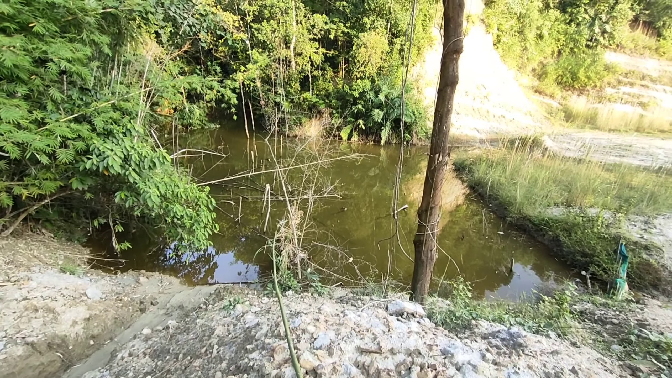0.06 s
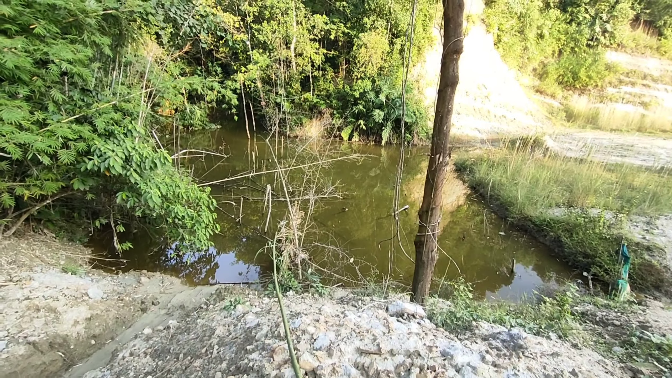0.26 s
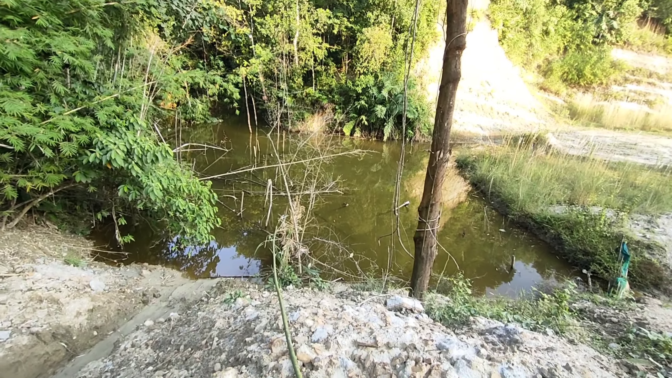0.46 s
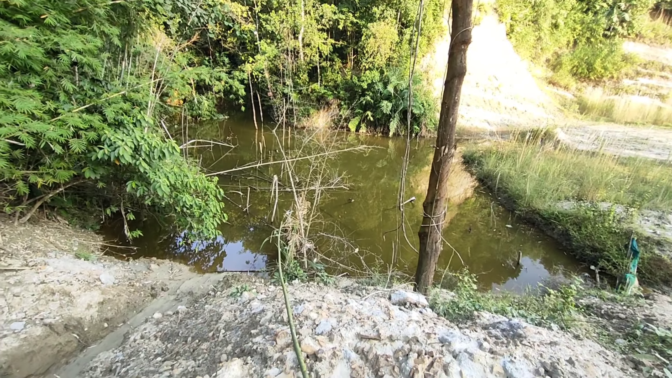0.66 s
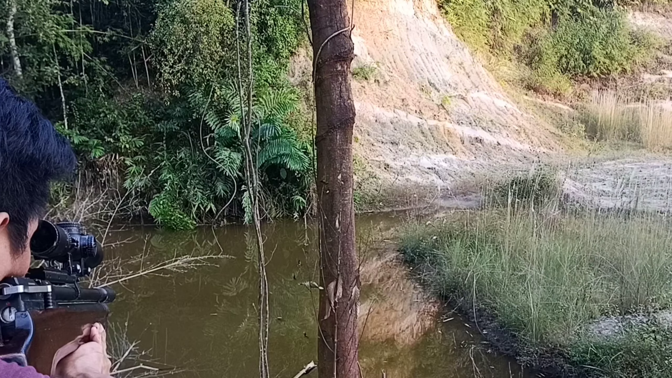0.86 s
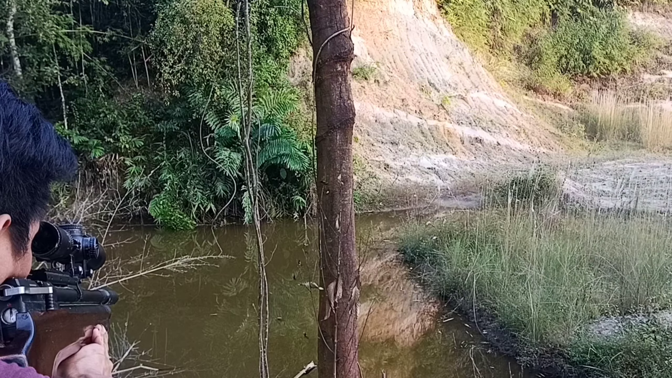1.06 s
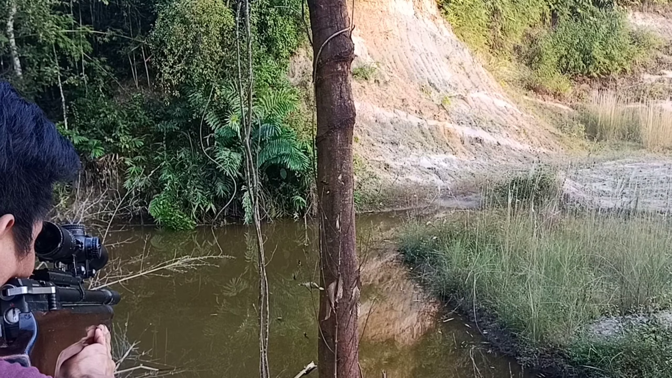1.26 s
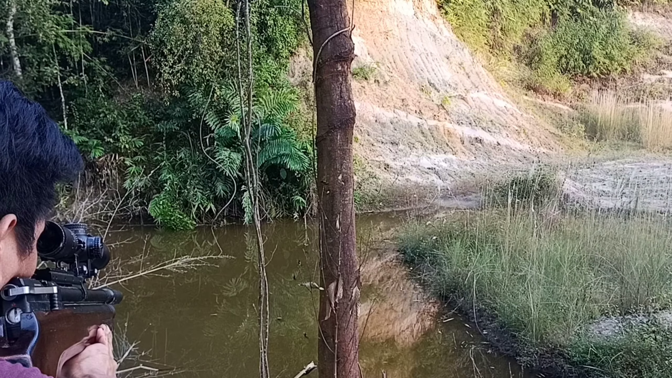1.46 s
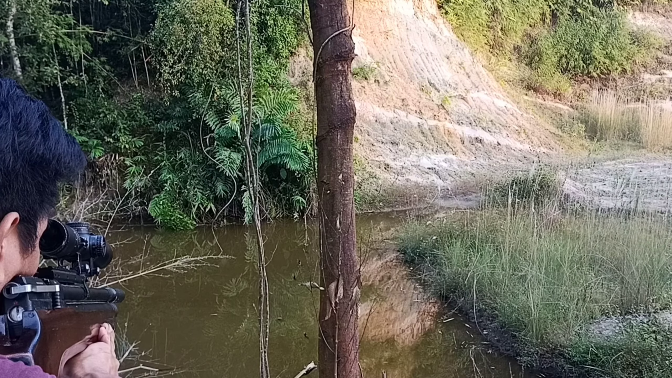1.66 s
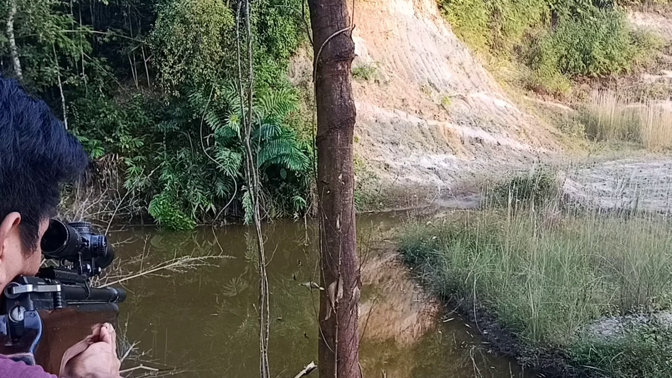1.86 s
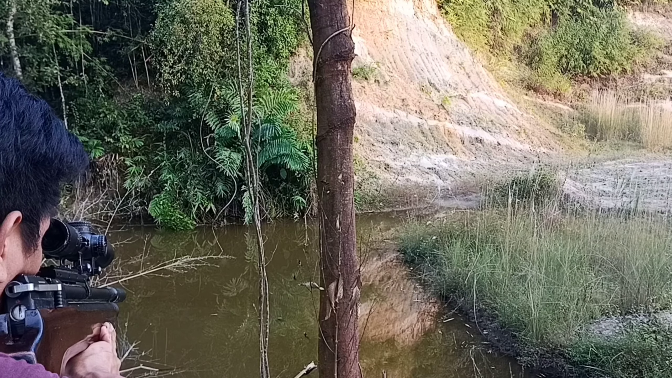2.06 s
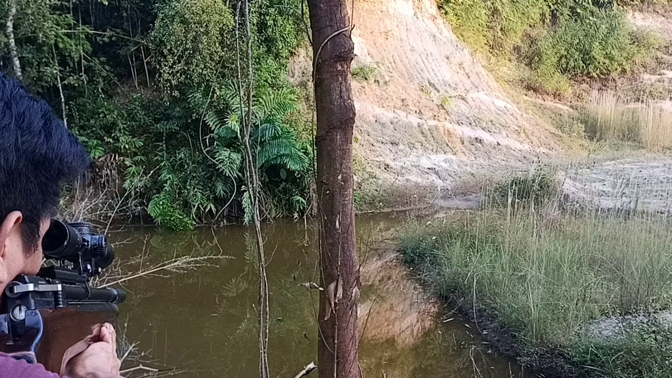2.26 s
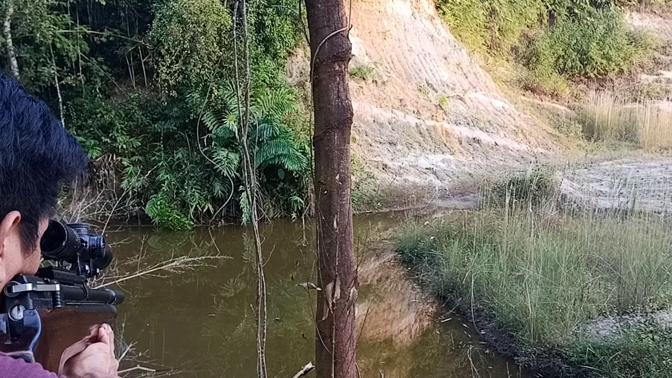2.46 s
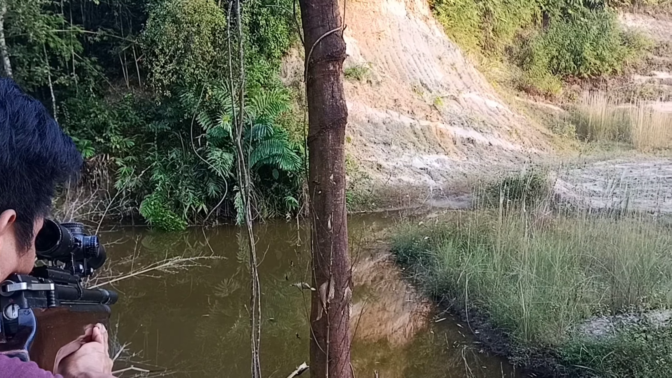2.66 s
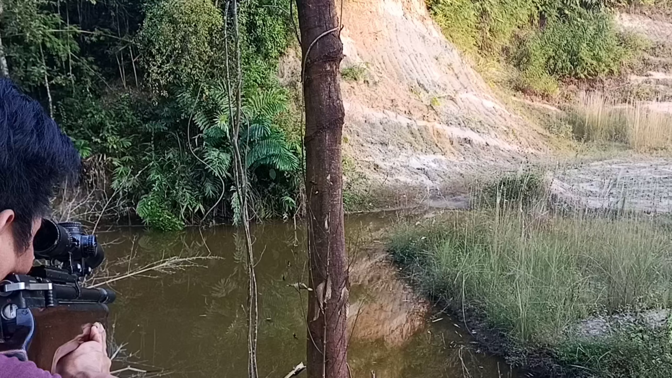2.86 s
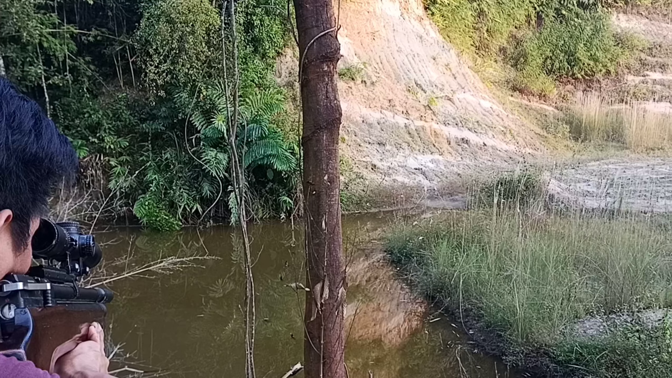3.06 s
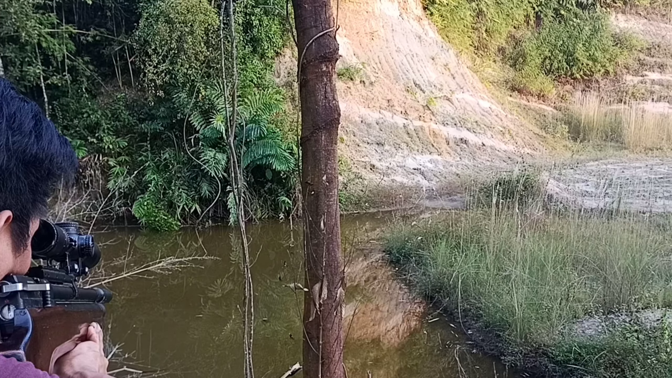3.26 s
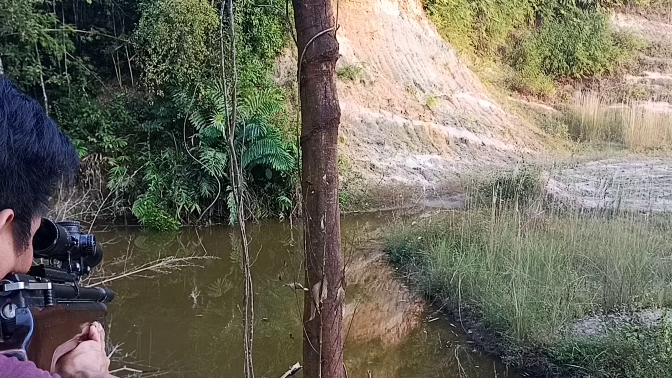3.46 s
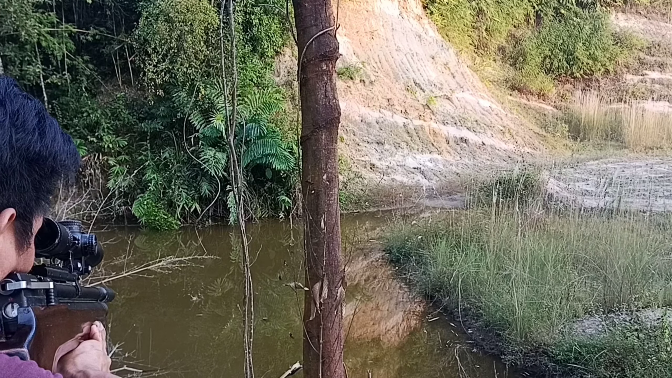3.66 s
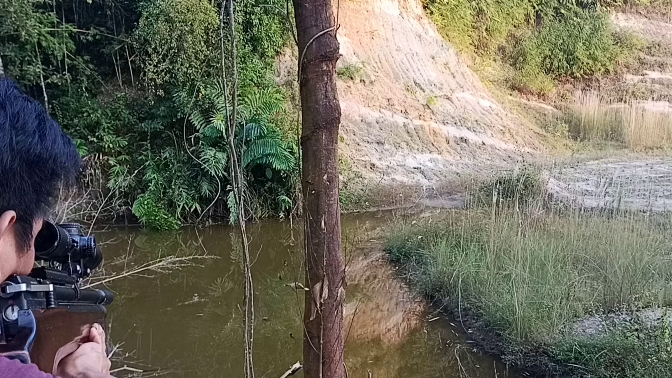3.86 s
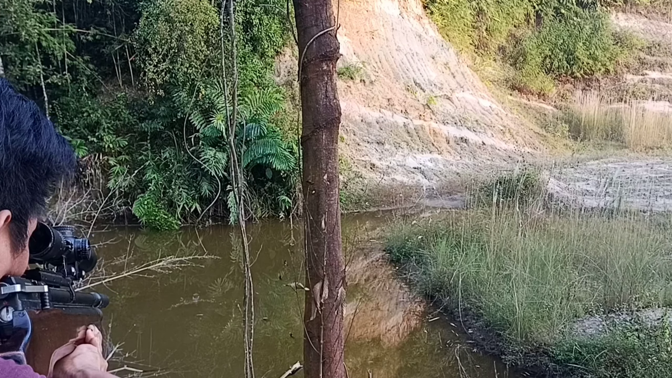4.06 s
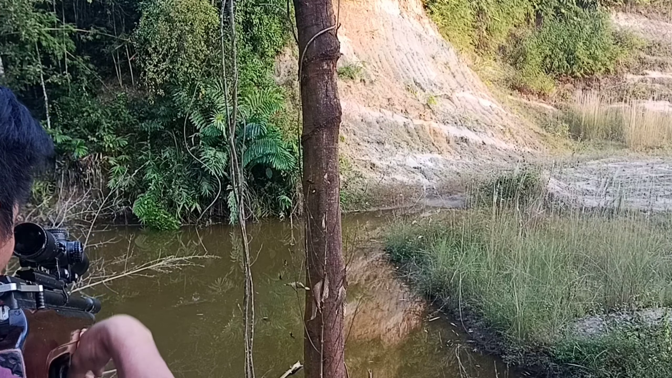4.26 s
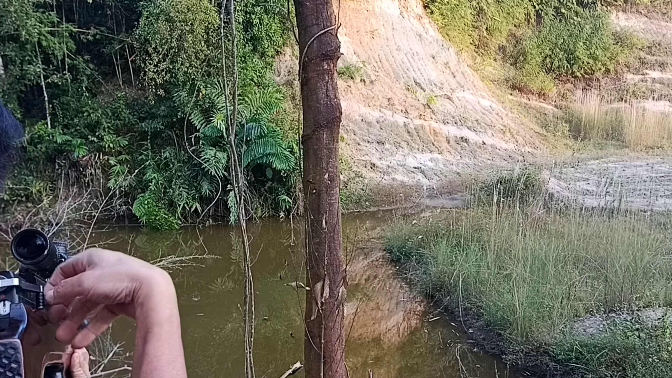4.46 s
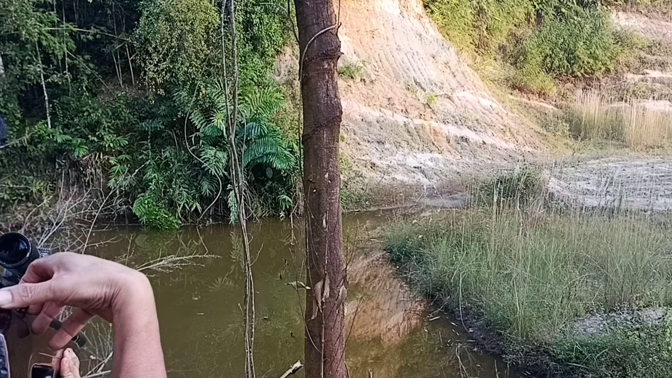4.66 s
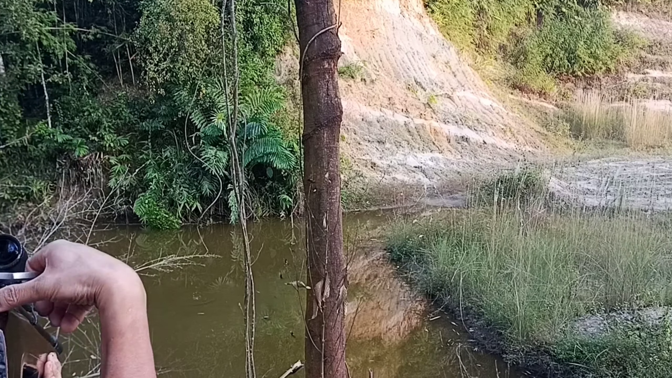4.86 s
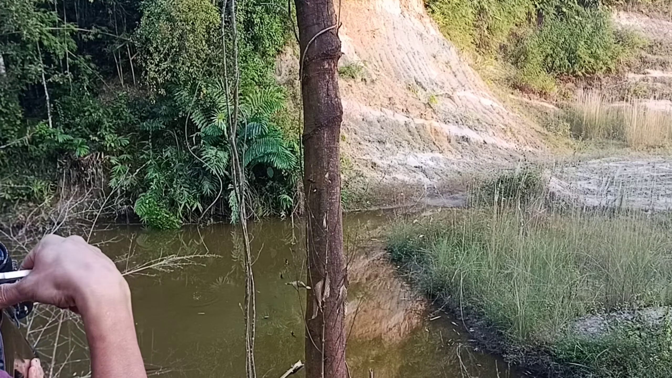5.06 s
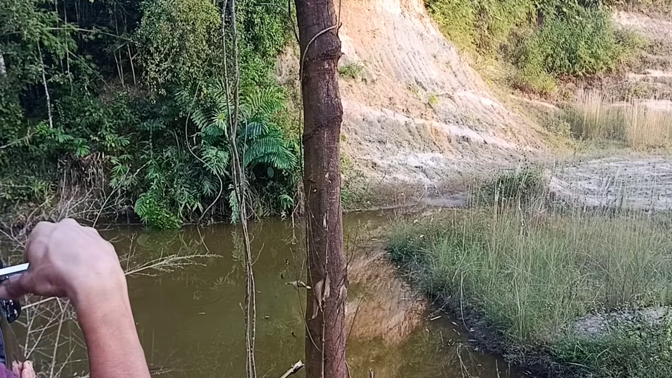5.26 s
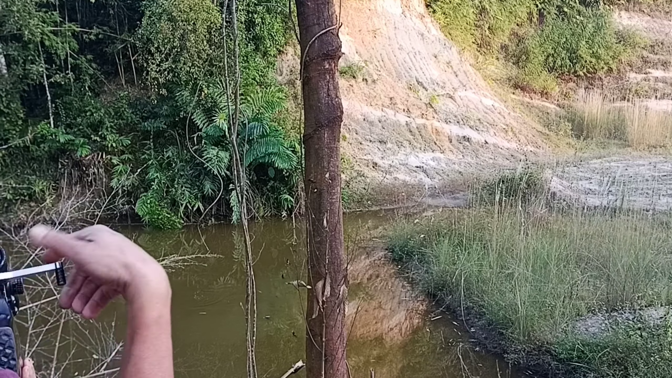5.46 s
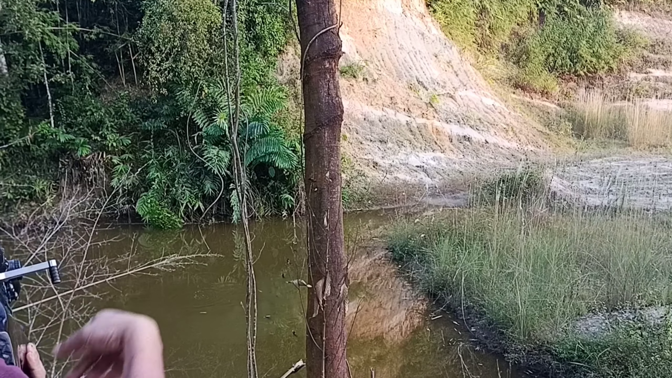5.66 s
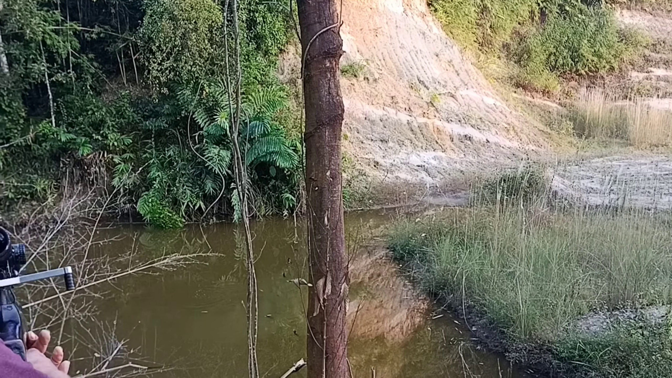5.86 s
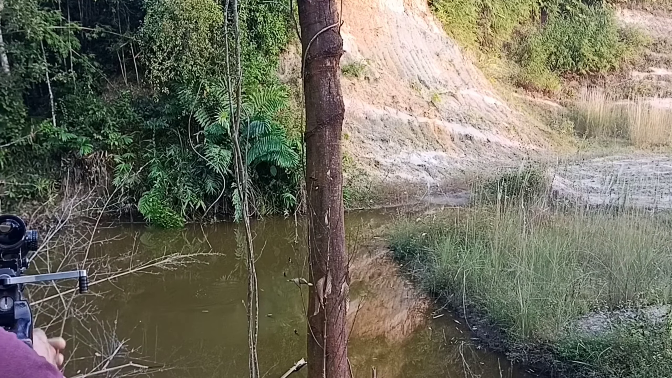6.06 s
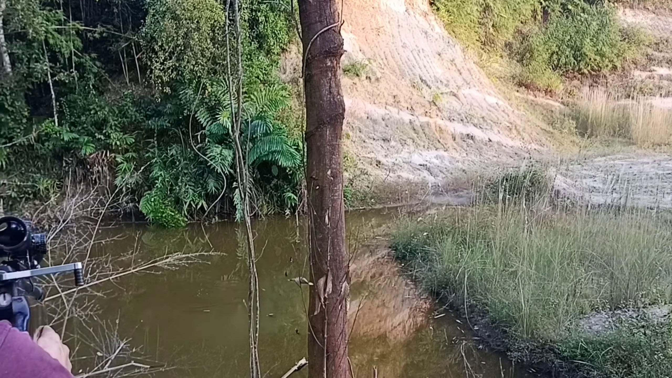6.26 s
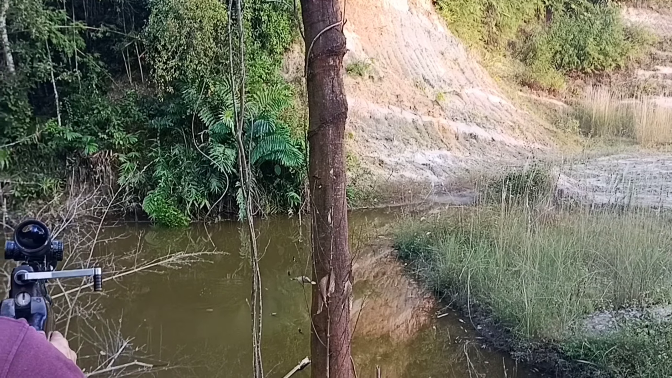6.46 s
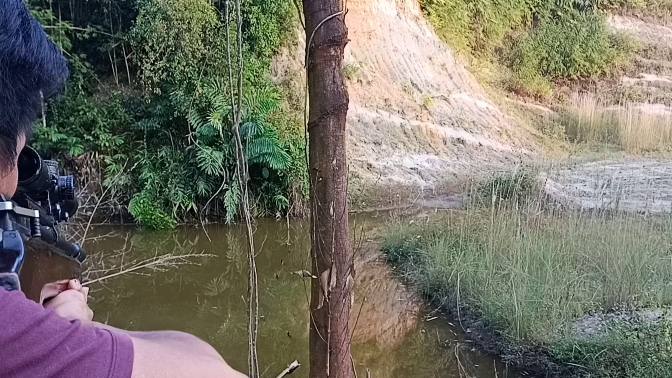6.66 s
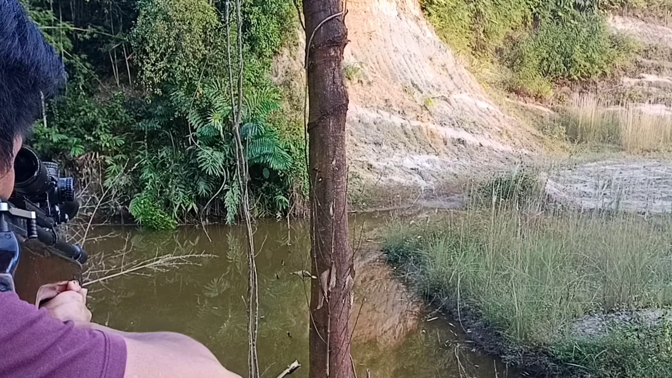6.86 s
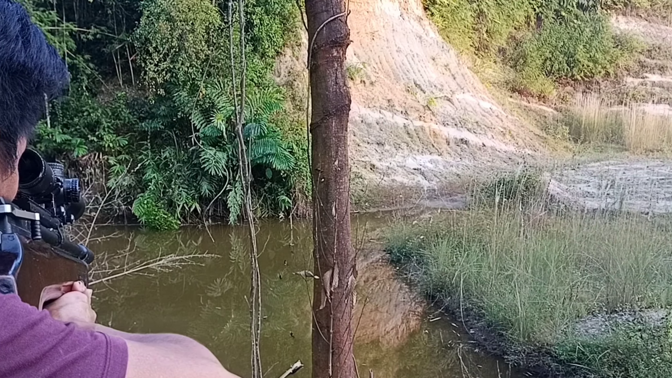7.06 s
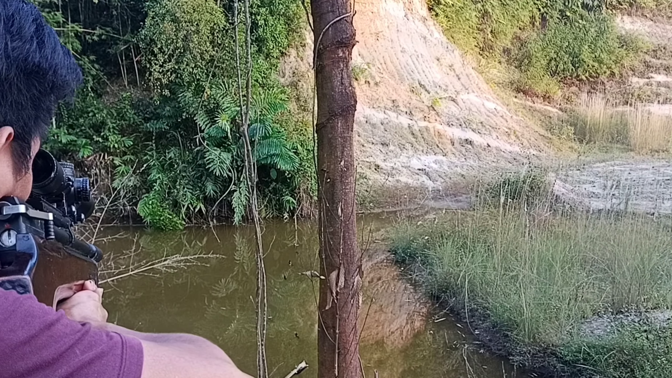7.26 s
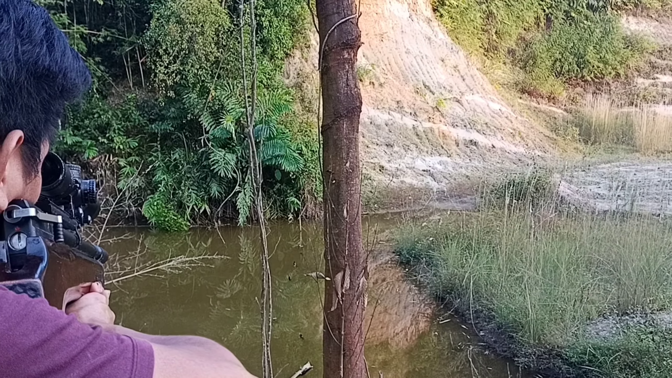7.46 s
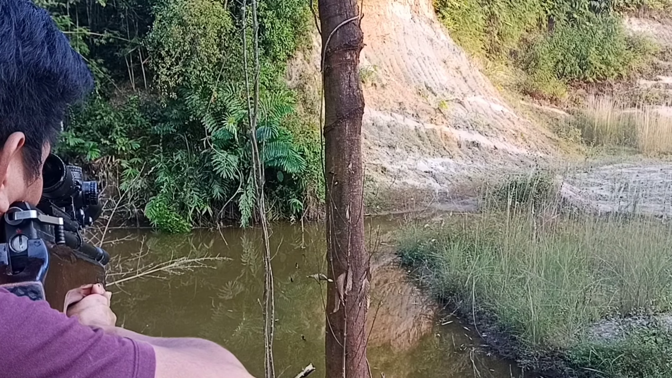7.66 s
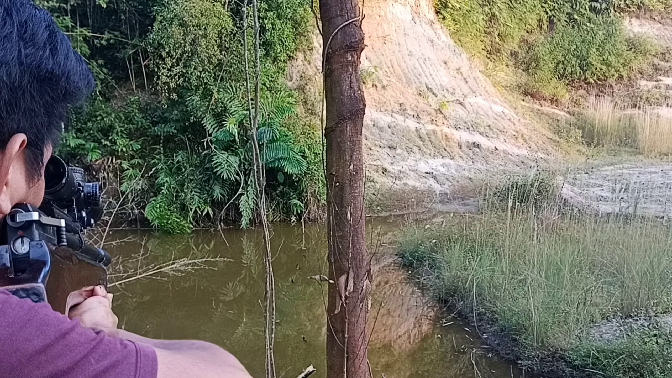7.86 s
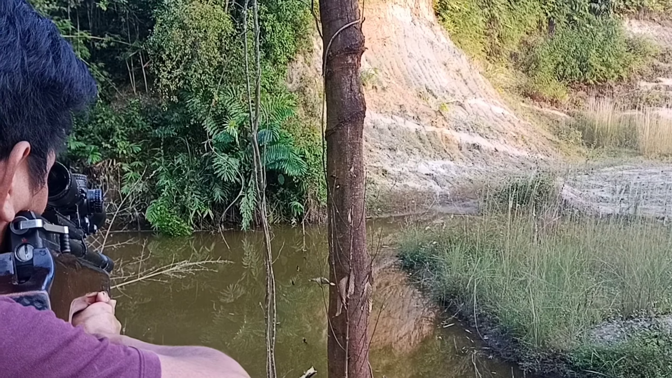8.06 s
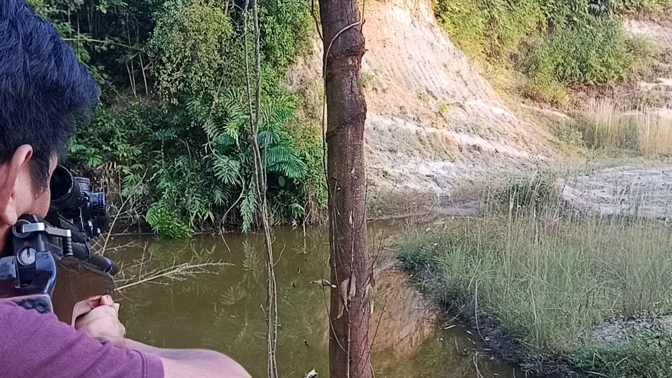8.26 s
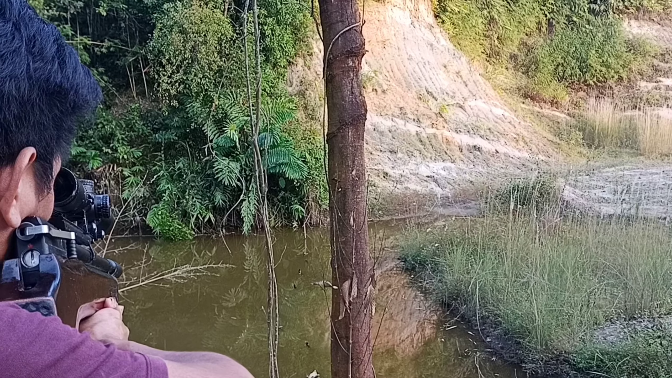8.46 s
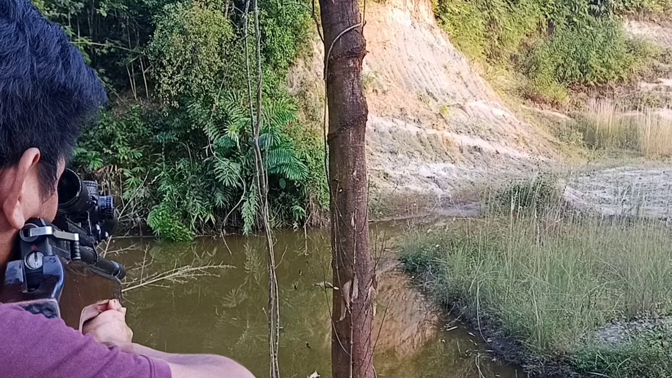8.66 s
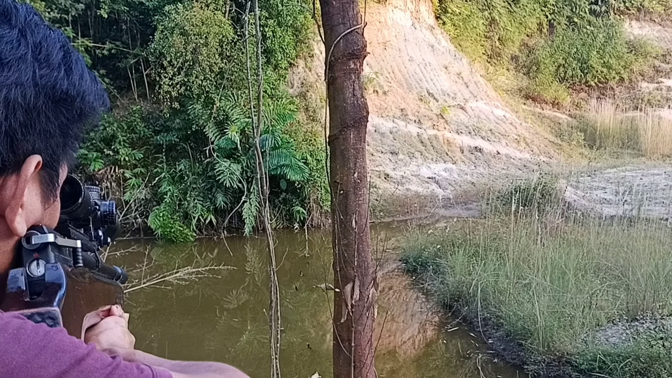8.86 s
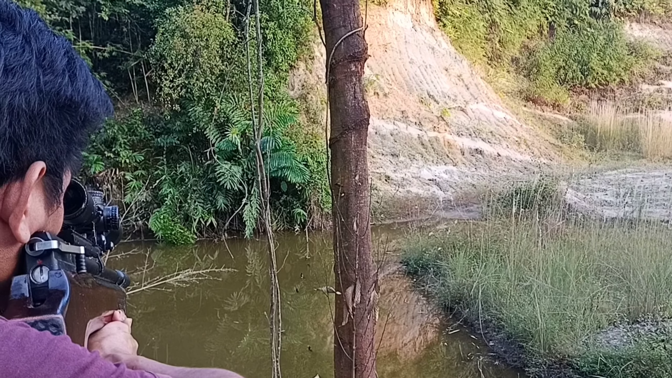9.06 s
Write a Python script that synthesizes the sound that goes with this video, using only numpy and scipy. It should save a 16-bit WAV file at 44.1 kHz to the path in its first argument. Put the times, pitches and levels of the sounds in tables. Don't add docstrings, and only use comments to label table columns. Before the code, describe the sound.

Faint wide tail of an earlier shot, then a brief silence. Insect chorus fades in with a fast near cricket and far wooden knocks. An air rifle cracks once with a hissing burst, followed at once by a hollow water plunge and bank echoes. Metal lever handling clicks and clacks, then the cricket grows fainter, a small insect trills and the stock bumps softly. Outdoors by a pond, microphone close to the shooter.

```python
import sys
import numpy as np
from scipy import signal
from scipy.fft import irfft, next_fast_len
from scipy.io import wavfile

SR = 44100
rng = np.random.default_rng(int(sys.argv[2]) if len(sys.argv) > 2 else 0)


def invert_db(x):
    u = np.asarray(x, float) / 20
    return 10 ** u


def wav_out(sig):
    wavfile.write(sys.argv[1], SR, np.round(np.clip(np.atleast_2d(sig).T, -1, 1) * 32767).astype(np.int16))


N = 401310
T = np.arange(N) / SR

SCENE_CHANGES = [.7, 6.608]
SPOT = np.searchsorted(SCENE_CHANGES, T)

# (start [s],
# cut off after [s], low edge [Hz], high edge [Hz], level [dB])
AIR_BURSTS = [(0, .026, 650, 1250, -48), (.003, .008, 1400, 2800, -48), (.0185, .007, 1900, 3000, -49),
              (.019, .005, 700, 1200, -45), (0, .036, 150, 600, -56), (.028, .02, 600, 2700, -53),
              (.058, .038, 700, 2800, -57), (0, .04, 3000, 6500, -55), (0, .12, 400, 8800, -59),
              (0, .09, 10500, 15500, -64), (3.4348, .002, 4000, 15500, -30), (3.4365, .006, 350, 800, -30),
              (3.439, .007, 110, 350, -31), (3.437, .007, 2500, 14400, -35),
              (3.4421, 0.021, 4000, 6300, -17.5), (3.4422, 0.019, 7200, 9400, -18),
              (3.4425, .018, 10000, 15500, -17.5), (3.4425, .024, 750, 3900, -37),
              (3.4362, .005, 750, 1500, -32), (3.4422, .019, 6200, 7300, -25),
              (3.446, .003, 850, 1500, -28), (3.447, .002, 1500, 3300, -32),
              (3.4615, .003, 4000, 13000, -40), (3.552, .0008, 3200, 14630, -16),
              (3.5535, .004, 3200, 6000, -21), (3.5535, .003, 6000, 14000, -24),
              (3.5515, .003, 1200, 1800, -33), (3.5519, .001, 3300, 5500, -18),
              (3.552, 0.003, 380, 800, -28), (6.235, .035, 8000, 15500, -53),
              (8.293, .03, 3000, 15000, -54), (8.303, .018, 450, 1000, -46)]
# (time since it opens [s], frequency [Hz])
CAVITY_PITCH = [(0, 300), (.002, 155), (.006, 108), (.01, 150), (.016, 155), (.02, 225), (.027, 220),
                (.031, 170), (.06, 140)]
# (time [s], level [dB], time to fall 60 dB [s])
PLUNGES = [
    (3.5534, -15.5, .075),
    (3.621, -28, .07),
    (3.673, -43, .15),
    (3.702, -38, .07),
    (3.769, -41, .09),
    (3.84, -44, .15),
    (3.884, -47, .3),
    (3.912, -46, .2),
]
# (arrival [s], bright [dB], top [dB], dull [dB], boom [dB])
BANK_RETURNS = [
    (3.464, -37, -35, -51, -72),
    (3.556, -35, -38, -42, -50),
    (3.598, -29, -33.5, -44, -52),
    (3.628, -36.5, -42, -42, -49),
    (3.76, -48, -55, -45.5, -48),
]
# (frequency [Hz], level [dB per Hz])
SCATTER_TONE = [(1650, -38), (2800, -12), (3680, -3.5), (5220, -1.5), (5450, -0.5), (6050, 0), (7860, 1),
                (9800, -11), (12700, -46), (21600, -120)]

# (time [s], level [dB], ring [Hz])
PINGS = [(1.1165, -40, 6100), (4.2125, -32, 7500), (4.638, -47, 1150), (5.2525, -17, 15200),
         (5.2542, -14, 7200), (5.259, -30, 7000), (5.312, -22, 3860), (5.313, -24, 1430),
         (5.317, -30, 1430), (5.322, -37, 6300), (5.369, -44, 1900), (5.3855, -39, 1880),
         (5.394, -45, 1790), (5.436, -40, 4100), (5.438, -45, 1150)]
# (time [s], level [dB], ring [Hz])
TAPS = [(.544, -55, 6000), (1.3375, -44, 3380), (4.871, -47, 1350), (4.883, -47, 1500), (5.132, -40, 3200),
        (5.2524, -8.5, 6700), (5.2525, -12, 10800), (5.2525, -18, 5000), (5.256, -27, 1050),
        (5.2605, -29, 1500), (5.254, -33, 550), (5.016, -39, 1100), (5.112, -46, 1200), (5.419, -39, 1000),
        (5.311, -35, 600), (5.3165, -27, 2400), (6.2985, -50, 2200)]
# (time [s], level [dB], ring [Hz])
RAPS = [(1.1165, -44, 2560), (4.8425, -38, 1400), (4.845, -41, 550), (4.957, -44, 2200), (5.012, -36, 3800),
        (5.016, -44, 1900), (5.058, -48, 1500), (5.3112, -21, 6000), (5.4125, -28, 5500), (5.414, -32, 800),
        (5.481, -45, 3000), (5.494, -43, 1400), (8.2932, -50, 1100)]
# (time
# [s], level [dB], ring [Hz])
SNAPS = [(.157, -55, 2100), (3.4375, -27, 500), (3.5524, -19, 540), (.545, -46, 1900), (4.2355, -40, 7600),
         (4.26, -40, 5000), (4.297, -43, 8800), (4.3375, -41, 8000), (4.5662, -31, 5200),
         (4.8415, -19, 6800), (4.842, -27, 4600), (4.9565, -37, 4000), (4.9565, -32, 6500),
         (5.0135, -36, 6500), (5.108, -41, 4500), (5.2452, -26, 5800), (5.315, -15, 2550),
         (5.398, -30, 3900), (5.4125, -30, 7800), (5.4445, -29, 6000), (5.445, -34, 7800),
         (5.481, -34, 7200), (5.517, -43, 3600), (5.573, -43, 3500), (5.5875, -27, 3900),
         (5.588, -38, 2300), (5.6285, -29, 3700), (5.651, -40, 3800), (5.6746, -37, 3300),
         (5.675, -43, 1700), (6.25, -37, 2400), (6.2505, -38, 3300), (6.5255, -44, 2300),
         (6.526, -47, 1100)]
# (time [s], level [dB])
TICKS = [(1.1394, -49), (4.2225, -42), (4.24, -38), (4.2534, -38), (4.26, -44), (4.284, -46), (4.2918, -44),
         (4.3175, -40), (4.3495, -37), (4.377, -46), (4.3865, -34), (4.423, -46), (4.4298, -35),
         (4.4335, -34), (4.5341, -40), (4.567, -33), (4.6044, -45), (4.6902, -43), (4.8413, -28),
         (4.9555, -34), (4.9644, -37), (5.013, -35), (5.1073, -37), (5.14, -34), (5.2452, -36),
         (5.3155, -36), (5.3255, -40), (5.341, -40), (5.4075, -35), (5.4125, -35), (5.4795, -39),
         (5.554, -46), (6.2223, -44)]
# (time [s], level [dB], ring [Hz], time to fall 60 dB [s])
STOCK_BUMPS = [(6.234, -41, 130, .05), (6.264, -41, 170, .05), (6.48, -47, 120, .08),
               (6.45, -49.5, 220, 0.039), (6.527, -46, 100, .06), (6.545, -44, 90, .12),
               (7.507, -45, 297, .05), (7.922, -45.5, 314, 0.075), (8.2929, -25.5, 145, .04),
               (8.316, -42, 380, .05), (8.3375, -39, 320, 0.067), (8.743, -37.5, 327, 0.042)]

# (time [s], level [dB])
FAR_KNOCKS = [(2.383, -52.5), (2.824, -53), (3.234, -53), (4.072, -47.5), (4.497, -41.5), (4.911, -46),
              (5.329, -45), (5.764, -47), (6.17, -46), (6.582, -47.5)]
# (frequency [Hz], width [Hz], level [dB])
KNOCK_BODY = [(524, 50, 8), (790, 80, 4), (1090, 55, 3), (1470, 65, -1), (800, 600, -9)]
# (start [s], length [s], first pitch [Hz], last pitch [Hz], level [dB])
BIRD_NOTES = [
    (1.678, 0.11, 720, 681, -70),
    (1.914, 0.078, 737, 720, -71),
    (2.17, 0.127, 763, 684, -67),
    (5.694, .054, 1090, 1150, -50),
    (5.755, .035, 1120, 1150, -56),
]

# (first chirp [s], run ends [s], peak level [dB])
CRICKET_RUNS = [(.8711, 3.0016, -47.5), (3.0794, 3.125, -49.5), (3.2254, 3.4, -48), (3.4, 4.003, -44.5),
                (4.083, 4.2166, -43), (4.2166, 5.132, -42.5), (5.132, 5.6, -42.5), (5.6, 6.0596, -44.5),
                (6.0596, 6.334, -44), (6.334, 6.612, -43), (6.612, 6.9396, -52.5), (6.9396, 7.5415, -52.5),
                (7.5415, 8.1473, -52.5), (8.1473, 9.115, -51.5)]
# (time into the chirp [s], frequency [Hz])
CHIRP_GLIDE = [
    (0, 7960),
    (.005, 8045),
    (.011, 7940),
    (.022, 7150),
]
# (start [s], length [s], level [dB])
TRILLS = [(6.601, .08, -54.5), (6.778, .12, -56.5), (7.0, 0.11, -57), (7.23, 0.11, -56.5),
          (7.44, 0.11, -56.5), (7.669, .12, -58), (7.89, .12, -57), (8.138, 0.13, -58)]
# (middle [s], level [dB])
SWELLS = [(1.2, -77), (1.47, -70), (1.76, -68), (2.05, -68), (2.37, -68), (2.72, -67), (3.05, -67.5),
          (4.33, -63.5), (4.58, -62), (4.93, -65), (5.35, -61), (5.66, -62.5), (5.92, -64), (6.2, -62),
          (6.5, -64)]
# (start [s], length [s], level [dB])
CICADA_RASPS = [(1.52, .22, -65), (2.36, 0.25, -58), (4.182, .12, -58), (5.956, .66, -59),
                (7.734, .27, -57.5), (8.242, .2, -59.5)]
# (frequency [Hz], width [Hz], start [s], end [s], level [dB])
STEADY_SINGERS = [(6220, 26, 0.74, 2.6, -69), (6160, 20, 3.4, 6.6, -65), (6780, 56, 6.61, 7.74, -64),
                  (6740, 38, 7.74, 9.6, -61.5), (8650, 49, 0.66, 3.4, -68), (13300, 1500, 6.61, 9.6, -69),
                  (9800, 700, -.1, .62, -82)]

# (frequency [Hz], level [dB per Hz])
LOW_CHORUS = [(2290, -75), (3900, -26.5), (4330, -4.5), (4770, 0), (5080, 0.5), (5350, -4.5), (5560, -18),
              (5700, -12.5), (7410, -46), (12500, -120)]
MID_CHORUS = [(3470, -33), (5900, -13.5), (6290, 0.5), (6610, 1), (6990, 0.5), (7150, -16), (7300, 0),
              (9490, -52), (16100, -120)]
HIGH_CHORUS = [(4240, -47), (7200, -20), (7740, 0.5), (8080, 5.5), (8280, -3), (8430, 1), (8990, -3),
               (9390, -18), (10300, -18), (13400, -34), (22000, -120)]
# (time [s], level [dB])
EFFORT = [(.85, -1.5), (2.2, 2), (3.4, -1.5), (3.9, -2), (5.3, 1.5), (6.6, .4), (7.1, 3), (8.3, -1.5),
          (9.1, 1.5)]
# (frequency [Hz], level [dB per Hz])
AIR_RUMBLE = [(15, -45), (25, -8.5), (97, 0.5), (226, -5.5), (374, -7), (517, -10), (598, -9.5),
              (1200, -25.5), (1560, -71), (2640, -120)]
AIR_MIDDLE = [(530, -10), (900, -4.5), (1120, -5.5), (1830, -4.5), (3310, -7.5), (4200, -6), (5460, -21),
              (9240, -120)]
AIR_TOP = [(5710, -35), (9700, -8.5), (9800, -14.5), (10900, -17), (13200, -9), (14900, 1), (15500, 0)]
# (middle [s], half width [s], lift [dB])
GUSTS = [(4.1, .3, 1.5), (5.5, .6, 2.5), (6.25, .07, 5), (6.54, .08, 3), (8.4, .3, 4.5), (8.9, .2, 2.5)]
# (time
# [s], level [dB])
RECORDER_GAIN = [(0, 3), (.12, -.5), (.3, -4), (.4, 1), (.6, 0), (.85, 0), (3.4, .6), (3.9, 5.5),
                 (5.3, 6.5), (6.1, 5), (6.605, 7), (6.612, 0.1), (9.1, .6)]


def rms_one(x):
    return x / np.sqrt(np.mean(x ** 2) + 1e-20)


def follow(table, t=T):
    return np.interp(t, *np.transpose(table))


def coloured(spectrum):
    size = next_fast_len(N, True)
    hz = np.fft.rfftfreq(size, 1 / SR) + 1
    at, level_db = np.transpose(spectrum)
    shape = invert_db(np.interp(np.log(hz), np.log(at), level_db, left=-99, right=-99))
    chance = rng.standard_normal(len(hz)) + 1j * rng.standard_normal(len(hz))
    return rms_one(irfft(shape * chance, size)[:N])


def drift(rate_hz):
    return coloured([(.3, 0), (rate_hz, 0), (4 * rate_hz, -24)])


def resonate(x, hz, width_hz):
    r = np.exp(-np.pi * width_hz / SR)
    feedback = [1, -2 * r * np.cos(2 * np.pi * hz / SR), r * r]
    return signal.lfilter(np.array([1, 0, -1]) * (1 - r * r) / 2, feedback, x)


def dying(t, t60):
    return invert_db(-60 * t / max(t60, .002))


def between(s, length, edge):
    return np.clip(np.minimum(T - s, s + length - T) / (2 * edge) + .5, 0, 1)


def glide(hz):
    return np.sin(2 * np.pi * np.cumsum(hz) / SR)


def add(out, s, x):
    i = round(s * SR)
    out[i:i + len(x)] += x[:N - i]


def shot():
    return air_bursts() + plunge() + bank_returns()


def air_bursts():
    out, t = np.zeros(N), T[:SR // 5]
    for s, cut, low_hz, high_hz, level_db in AIR_BURSTS:
        t60 = .015 + 7.5 * cut
        band = signal.butter(4, [low_hz, high_hz], "band", fs=SR, output="sos")
        noise = rms_one(signal.sosfilt(band, rng.standard_normal(len(t))))
        noise *= dying(t, t60) * dying(np.maximum(t - cut, 0), 0.021)
        add(out, s, invert_db(level_db) * signal.sosfilt(band, noise))
    return out


def plunge():
    HOLD_S, SHUTS_S = .011, .035
    ECHO_SMEAR = .03
    out, t = np.zeros(N), T[:SR // 2]
    tone = -glide(follow(CAVITY_PITCH, t))
    for s, level_db, t60 in PLUNGES:
        rise = np.minimum(t / (ECHO_SMEAR * (s - PLUNGES[0][0]) + 1e-4), 1)
        fall = dying(np.maximum(t - HOLD_S, 0), t60) * dying(np.maximum(t - SHUTS_S, 0), .04)
        add(out, s, invert_db(level_db) * rise * tone * fall)
    add(out, 3.5521, invert_db(-17) * np.hanning(round(0.0011 * SR)))
    return out


def bank_returns():
    RISE_S, T60_S = .006, np.c_[[.85, .45, .8, .8]]
    power, start = np.zeros((4, N)), round(BANK_RETURNS[0][0] * SR)
    for s, *levels_db in BANK_RETURNS:
        after = np.maximum(T[start:start + SR] - s, 0)
        rise = np.minimum(after / RISE_S, 1)
        power[:, start:start + SR] += rise * invert_db(2 * (np.c_[levels_db] - 60 * after / T60_S))
    bright, top, dull, boom = np.sqrt(power)
    scatter = bright * coloured(SCATTER_TONE)
    scatter += top * coloured([(9300, 1), (11000, -3), (13500, -4), (15500, 1)])
    scatter += dull * coloured([(200, 0.5), (550, 0), (900, -6), (1500, -3.5), (2200, -6), (3000, -6),
                                (4200, -16)])
    scatter += boom * coloured([(60, -25), (100, -6), (140, -3), (180, -1), (260, -22)])
    return invert_db(1.5 * drift(100)) * scatter


def metal_clicks():
    out, t = np.zeros(N), T[:SR // 16]
    ticks = [(s, level_db, 10800) for s, level_db in TICKS]
    kinds = [(PINGS, .19, 1), (TAPS, .55, 1), (RAPS, .9, 1), (SNAPS, .4, .35), (ticks, .55, .5)]
    for blows, spread, rattle in kinds:
        for s, level_db, hz in blows:
            t60 = rattle * (.004 + 28 / hz + .0005 * max(level_db + 30, 0))
            push = rng.standard_normal(len(t)) * dying(t, t60)
            push[0] = 2.3 / rattle
            rung = resonate(resonate(push, hz, spread * hz), hz, 1.24 * spread * hz)
            add(out, s, invert_db(level_db) * rung / np.abs(rung).max())
    t = T[:SR // 3]
    echo = rng.standard_normal(len(t)) * dying(t, .3)
    echo /= np.sqrt(np.sum(echo ** 2))
    return out + invert_db(-22) * signal.fftconvolve(out, echo)[:N]


def stock_bumps():
    out, t = np.zeros(N), T[:SR // 5]
    for s, level_db, hz, t60 in STOCK_BUMPS:
        turns = hz * t + .45 * invert_db(level_db + 26) * (1 - np.exp(-t / .001))
        ring = np.sin(2 * np.pi * turns) * dying(t, t60)
        ring += 0.2 * np.sin(2 * np.pi * 1.98 * hz * t) * dying(t, 0.31 * t60)
        rustle = rms_one(resonate(resonate(rng.standard_normal(len(t)), 220, 470), 220, 650))
        blow = ring + 0.1 * rustle * dying(t, 0.31)
        add(out, s, invert_db(level_db + 1.5) * np.minimum(t / .0008, 1) * blow)
    return out


def far_knocks():
    out, t = np.zeros(N), T[:SR // 3]
    crowd = .8 * dying(t, .6) * dying(np.maximum(t - .08, 0), .08)
    front = np.minimum(t / .012, 1) * (crowd + .25 * dying(t, 1.1))
    for s, level_db in FAR_KNOCKS:
        arrivals_db = 1.5 * np.repeat(rng.standard_normal(len(t) // 300), 300)
        noise = rng.standard_normal(len(t)) * invert_db(arrivals_db)
        body = sum(invert_db(g_db) * resonate(noise, hz, width) for hz, width, g_db in KNOCK_BODY)
        add(out, s, invert_db(level_db - 4.5) * rms_one(body) * front)
    return signal.sosfilt(signal.butter(4, 1750, fs=SR, output="sos"), out) * (T < SCENE_CHANGES[1])


def bird():
    out = np.zeros(N)
    for s, length, hz, end_hz, level_db in BIRD_NOTES:
        n = round(length * SR)
        add(out, s, invert_db(level_db) * np.hanning(n) ** .5 * glide(np.linspace(hz, end_hz, n)))
    return out * (1 + .25 * drift(120))


def cricket():
    CHIRPS_PER_S = 21.65
    t, out = T[:round(.024 * SR)], np.zeros(N)
    shape = np.interp(t, [0, .004, .011, .016, .022], [0.25, 0.85, 0.96, 0.48, 0.1])
    for s, end, level_db in CRICKET_RUNS:
        for at in np.linspace(s, end, round((end - s) * CHIRPS_PER_S), endpoint=False):
            pitch_luck, time_luck, level_luck = rng.standard_normal(3)
            tone = glide(follow(CHIRP_GLIDE, t) * (1 + 0.0043 * pitch_luck))
            tilt_db = 4.1 if at > 6.6 else -2.5
            tone *= invert_db(tilt_db * t / t[-1])
            add(out, at - .008 + 0.00073 * time_luck, invert_db(level_db + 1.1 * level_luck) * shape * tone)
    return out * (1 + 0.17 * drift(400))


def trills():
    out = np.zeros(N)
    for s, length, level_db in TRILLS:
        t = T[:round(length * SR)]
        pulses = np.maximum(np.sin(2 * np.pi * 83 * t), 0) ** 0.64 * .75 + .15
        wobble = np.cumsum(rng.normal(0, .06, len(t)))
        tone = np.sin(2 * np.pi * 9230 * t + wobble)
        swell = (0.58 + t / length) * np.minimum((length - t) / 0.015, 1)
        add(out, s, invert_db(level_db) * swell * pulses * tone)
    return out * (1 + .3 * drift(300))


def single_singers():
    swell = invert_db(1.6 * drift(70)) * coloured([(8900, -3), (9200, 0), (9600, -5), (10200, -10)])
    swell *= sum(invert_db(level_db) * between(s - .1, 0.19, 0.087) for s, level_db in SWELLS) * (SPOT < 2)
    rasp = invert_db(1.6 * drift(90)) * coloured([(5200, -14), (5600, -6), (6300, -6), (6850, -4), (7100, -12)])
    rasp *= sum(invert_db(level_db) * between(s, length, 0.038) for s, length, level_db in CICADA_RASPS)
    white, steady = coloured([(3000, 0), (15500, 0)]), np.zeros(N)
    for hz, width, s, end, level_db in STEADY_SINGERS:
        steady += invert_db(level_db) * between(s, end - s, .01) * rms_one(resonate(white, hz, width))
    return swell + rasp + steady


def steady_db(*spot_levels_db):
    return follow(RECORDER_GAIN) + np.array(spot_levels_db)[SPOT]


def choruses():
    effort_db = follow(EFFORT)
    low_db = steady_db(-68.5, -60, -58.5) + 1.33 * drift(56)
    mid_db = steady_db(-83, -63.5, -61) + effort_db + 0.82 * drift(50)
    high_db = steady_db(-73.5, -61, -65) + (SPOT == 1) * effort_db + 1.5 * drift(87)
    low = invert_db(low_db) * coloured(LOW_CHORUS)
    mid = invert_db(mid_db) * coloured(MID_CHORUS)
    high = invert_db(high_db) * coloured(HIGH_CHORUS)
    return low + mid + high


def katydid_db():
    PERIOD_S, FIRST_S, STROKES_PER_S = .24, .95, 30
    groups = np.maximum(np.cos(2 * np.pi * (T - FIRST_S) / PERIOD_S), 0)
    strokes = 1 + np.cos(2 * np.pi * STROKES_PER_S * T + drift(3))
    return 7.5 * (groups * strokes / 2 - .2)


def air():
    gust_db = sum(lift_db * np.exp(-((T - s) / width) ** 2) for s, width, lift_db in GUSTS)
    rumble_db = steady_db(-79.5, -65, -61) + gust_db + 0.71 * drift(9)
    middle_db = steady_db(-76, -70.5, -66.5) + .85 * gust_db
    top_db = steady_db(-76, -65.3, -64.5) + .3 * gust_db + (SPOT == 1) * katydid_db()
    rumble = invert_db(rumble_db) * coloured(AIR_RUMBLE)
    middle = invert_db(middle_db) * coloured(AIR_MIDDLE)
    return rumble + middle + invert_db(top_db) * coloured(AIR_TOP)


def scene():
    WIDTH, WIDE_PAN_DB = 0.8, -3
    first = T < SCENE_CHANGES[0]
    fader = np.where(first, 1, np.interp(T, [.85, 1.1], [0, 1]))
    fader *= invert_db(np.interp(T, [3.41, 3.43, 3.435], [0, -13, 0]))
    field = air() + choruses() + single_singers()
    blast = shot()
    far = field + cricket() + trills() + far_knocks()
    mid = blast + metal_clicks() + stock_bumps() + bird() + fader * far
    delayed = np.roll((field + blast)[:SR], 900)[np.minimum(np.arange(N), SR - 1)]
    side = first * WIDTH * delayed
    silence = np.interp(T, [.596, .6, .846, .85], [1, 0, 0, 1])
    return silence * np.array([mid + side, mid - side]) * invert_db(np.outer([.5, -.5], first * WIDE_PAN_DB))


def roll_off(x):
    return signal.sosfilt(signal.butter(12, 16640, fs=SR, output="sos"), x)


def record(dry):
    no_deep_bass = signal.butter(2, 60, "high", fs=SR, output="sos")
    no_very_top = signal.butter(8, 16500, fs=SR, output="sos")
    mix = signal.sosfilt(np.vstack([no_deep_bass, no_very_top]), dry)
    return roll_off(mix)


dry = scene()
out = record(dry)
wav_out(out)
```